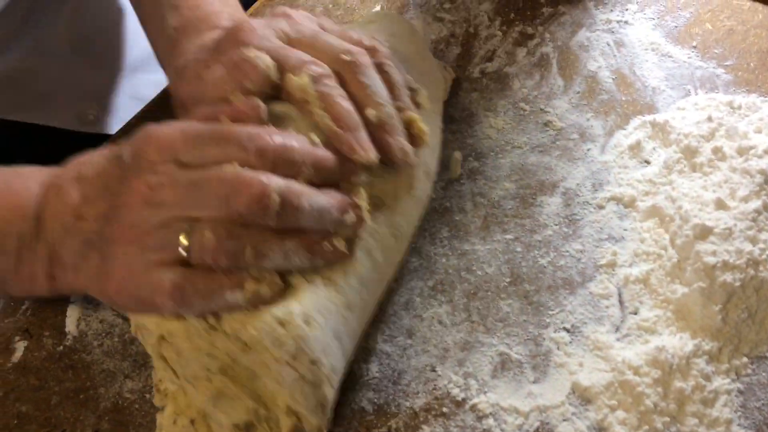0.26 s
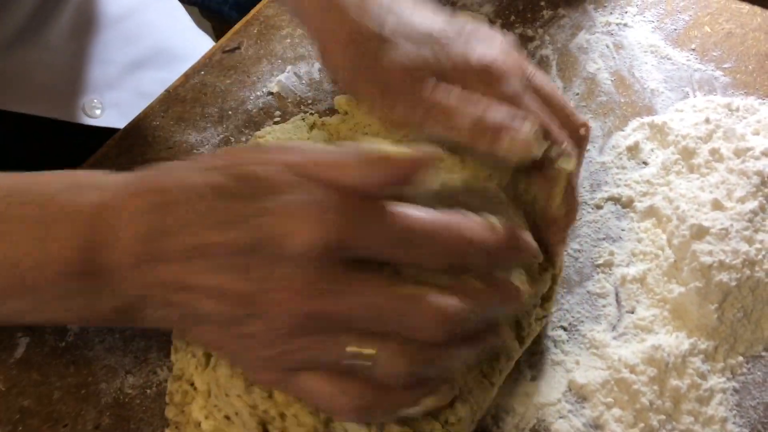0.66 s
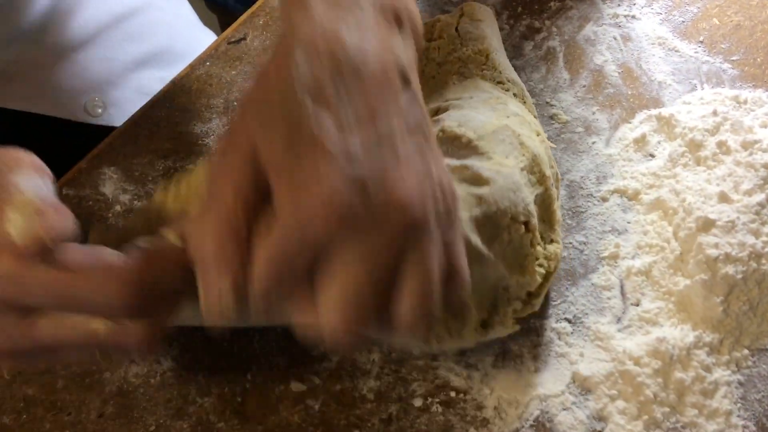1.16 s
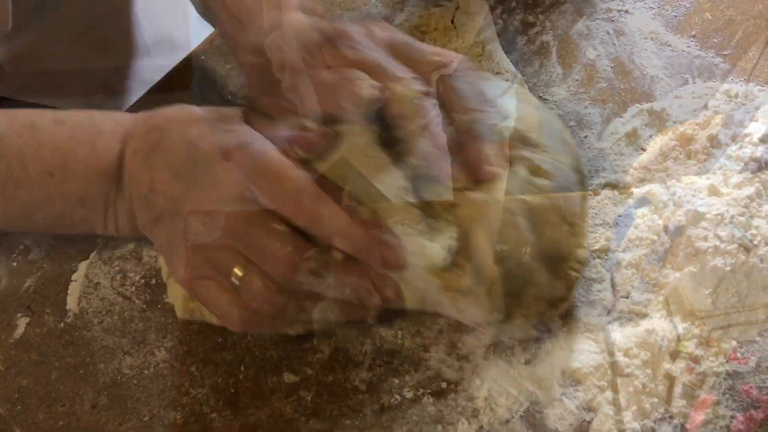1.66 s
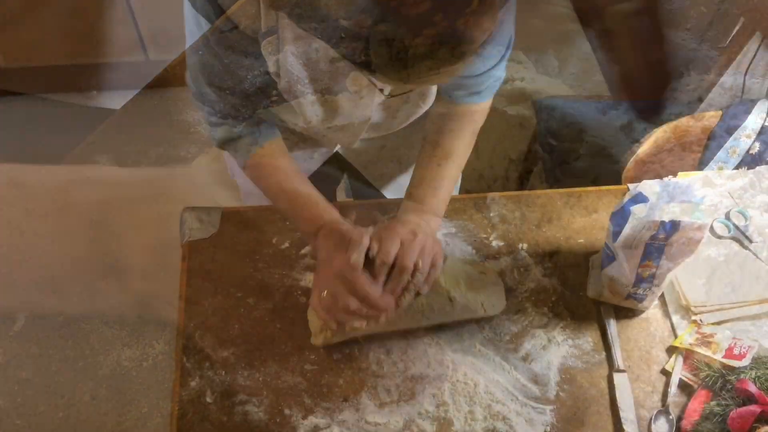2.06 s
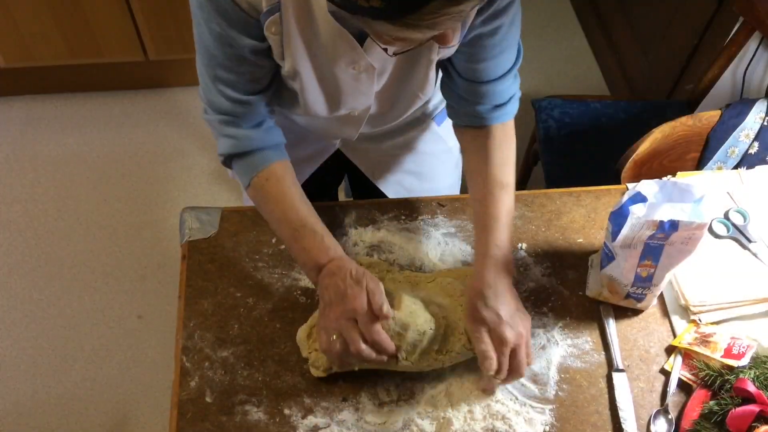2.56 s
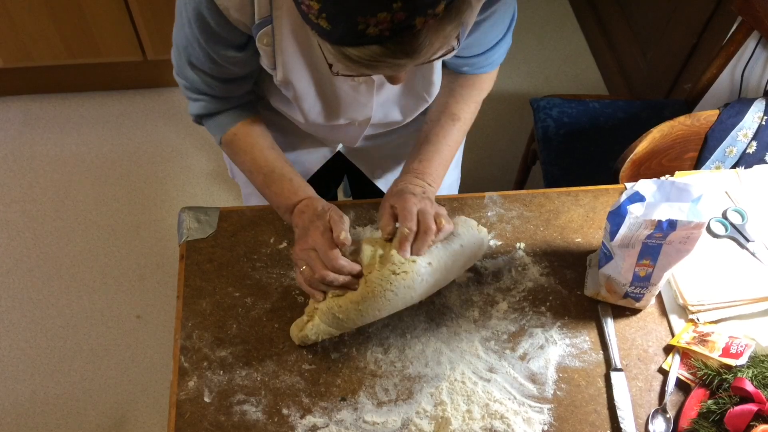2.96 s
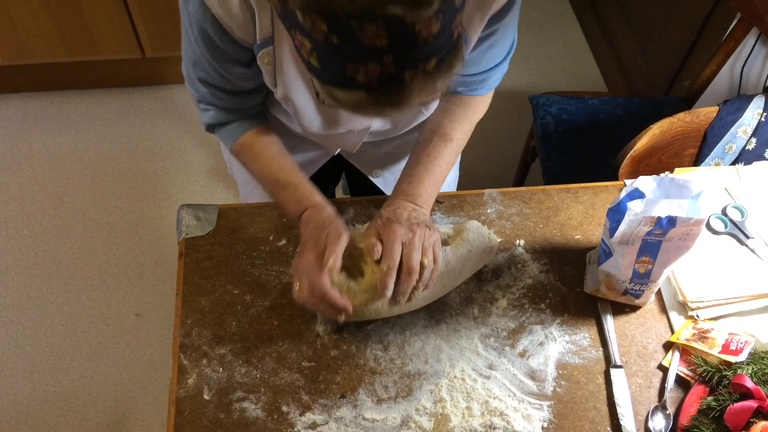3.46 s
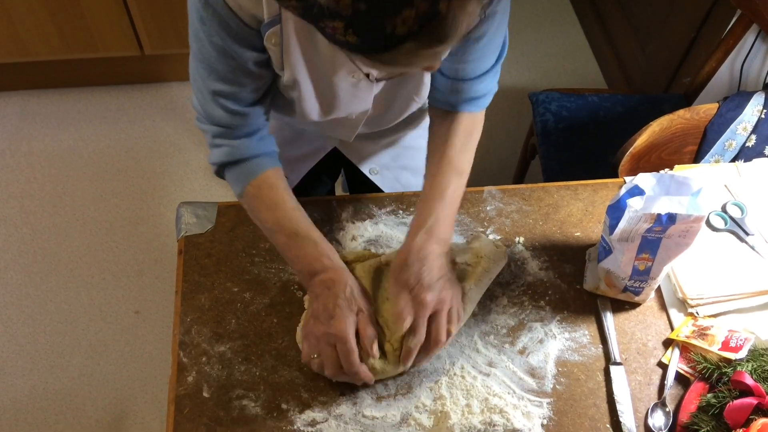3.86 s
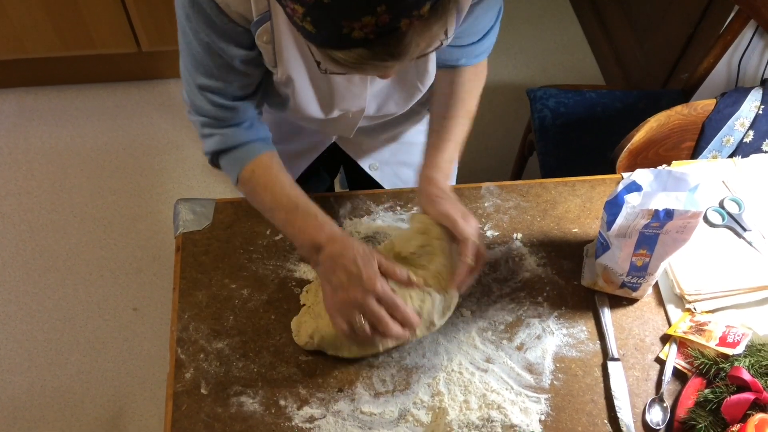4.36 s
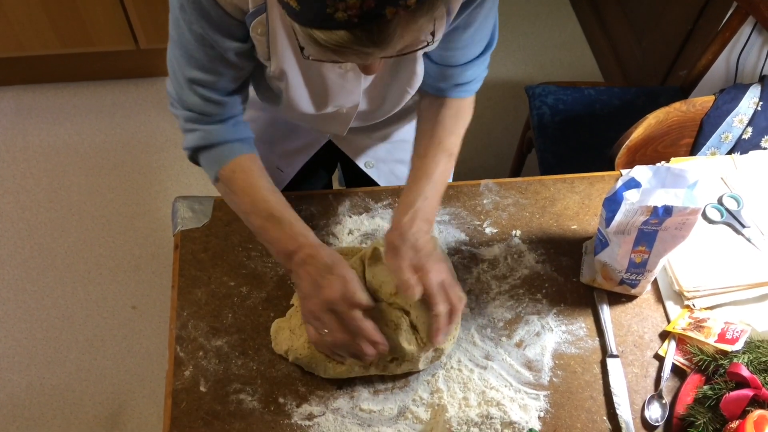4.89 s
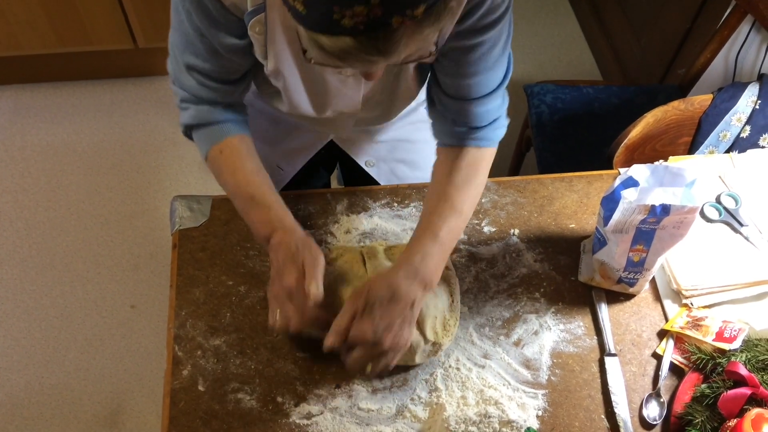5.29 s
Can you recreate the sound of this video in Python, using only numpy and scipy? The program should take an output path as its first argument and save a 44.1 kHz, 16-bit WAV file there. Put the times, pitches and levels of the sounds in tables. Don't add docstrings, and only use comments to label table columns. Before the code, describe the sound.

In a small kitchen with a low steady hum, hands push heavy dough against a wooden tabletop. A slap opens, dry hissing strokes follow, then a heavy cluster of thuds with sticky crackle. Later, quieter rubbing surrounds single hollow thumps that shake the table legs. A faint clock ticks about twice a second; short room echo.

```python
import sys
import numpy as np
from scipy import signal
from scipy.fft import rfft, irfft
from scipy.io import wavfile
from scipy.ndimage import uniform_filter1d

SR = 44100
rng = np.random.default_rng(int(sys.argv[2]) if len(sys.argv) > 2 else 0)


def decibels_to_gain(level_db):
    exponent = np.asarray(level_db, float) / 20
    return 10 ** exponent


def generate_wav(signal):
    frames = np.transpose(np.atleast_2d(signal))
    scaled = np.clip(frames, -1, 1) * 32767
    pcm = np.round(scaled).astype(np.int16)
    wavfile.write(sys.argv[1], SR, pcm)


N = 243873

# (frequency [Hz], level [dB])
HUM_SPECTRUM = [(15, -33.5), (25, -2), (70, 1.5), (102, 7.5), (130, -31.5), (373, -10.5), (416, -16),
                (591, -12), (887, -36.5), (2550, -20), (4140, -47), (14800, -40.5), (16000, -32.5)]
# (time [s], level [dB])
HAND_WEIGHT = [(0, -61), (.2, -57), (.7, -61), (1.2, -60), (1.8, -62), (2.05, -68.5), (2.9, -70.5),
               (3.15, -74), (3.75, -68), (4.4, -71), (4.9, -70.5), (5.53, -76)]
# (start [s], length [s], hiss level [dB], swell from start to end [dB])
STROKES = [(0, 0.038, -53, -22), (0.077, 0.51, -47, 15.5), (0.571, 0.1, -51, -8), (0.659, 0.086, -52, -12),
           (.79, 0.081, -67, 0), (.865, 0.085, -51, 0), (0.939, 0.2, -54.5, -9), (1.021, 0.49, -51, 15),
           (1.526, 0.36, -52.5, 9.5), (1.774, 0.29, -58, 1), (1.971, 0.082, -62, 3.5),
           (2.08, 0.46, -65, -2), (3.15, 0.14, -76, -1.5), (2.447, 0.18, -70.5, -4.5),
           (2.606, 0.14, -69, -13.5), (2.71, 0.33, -67.5, -2), (3.01, 0.15, -68.5, -1.5),
           (3.281, .13, -66, -0.5), (3.36, 0.28, -70.5, -7), (3.563, 0.48, -65, -10),
           (4.07, 0.38, -68, -2.5), (4.36, 0.51, -65.5, 10), (4.801, 0.18, -67, 6), (5.1, 0.21, -67.5, 0),
           (5.265, 0.5, -66.5, -6)]
# (time [s], crackle level [dB], table shake level [dB], 60 dB decay [s])
SQUASHES = [(0, -42, -22.5, 0.1), (.5, -56, -64, 0.2), (0.601, -51, -47, 0.46), (0.864, -39.5, -25.5, 0.67),
            (.97, -46, -28, 0.31), (1.04, -54, -34, 0.12), (1.36, -55, -48, 0.47),
            (2.625, -54.5, -62, 0.53), (3.27, -62, -49, 0.28), (3.32, -53.5, -70, 0.27),
            (4.229, -50.5, -43.5, 0.23), (4.92, -75, -59.5, 0.34), (5.1, -66.5, -47, .2),
            (5.12, -54, -66, 1)]
# (frequency [Hz], level [dB])
FLOUR_SPECTRUM = [(880, -36), (1500, -8.5), (1920, -4), (2140, -4.5), (2910, -9.5), (5710, -2),
                  (14600, -6.5), (15500, -3.5), (16000, -32.5)]
# (frequency [Hz], level [dB])
DOUGH_SPECTRUM = [(150, -40.5), (250, -10), (291, -0.5), (557, -6.5), (735, -3.5), (1080, -6.5), (1990, -9),
                  (4000, -19), (5200, -31), (8800, -120)]
# (time [s], peak level [dB], centre [Hz], 60 dB decay [s], flour spray level [dB])
SLAPS = [(.006, -24, 2060, 0.029, 4.5), (.009, -28.5, 1850, 0.0096, -15), (0.612, -43, 1500, 0.046, -14),
         (.872, -27.5, 870, 0.089, -1), (.879, -22, 809, 0.07, -9), (0.984, -29.5, 980, 0.045, -13),
         (1.077, -35, 790, 0.037, -13), (1.384, -36.5, 1030, 0.088, -24), (2.6295, -32, 900, 0.18, -19),
         (3.259, -59, 1210, 0.098, -25.5), (4.0848, -24, 1000, 0.25, -20), (4.194, -39, 696, 0.09, -28.5),
         (5.108, -30, 1450, 0.17, -28), (5.187, -46.5, 1400, 0.16, -17), (5.22, -49.5, 1200, 0.12, -19)]
# (time [s], peak level [dB], favoured top pitch [Hz], board level [dB], favoured board
# pitch [Hz])
BLOWS = [(.010, -21, 163, -9, 810), (.8715, -10, 202, -8, 614), (0.8782, -9.5, 182, -8, 429),
         (0.8829, 2, 178, -12, 635), (.982, -9.5, 186, -22, 417), (1.076, -36, 198, 0, 514),
         (1.384, -37.5, 132, -7.5, 719), (1.886, -44.5, 145, -13, 750), (2.199, -47.5, 137, -19.5, 516),
         (2.6288, -16, 211, -15, 806), (4.0852, -10, 262, -12.5, 590), (4.192, -28.5, 282, -3.5, 497),
         (5.102, -25.5, 194, -19, 390), (5.1148, -14, 180, -21, 450)]
# (time [s], peak level [dB], favoured top pitch
# [Hz], board level [dB])
MORE_BLOWS = [(.145, -34, 239, -14.5), (.151, -42, 239, -27), (.293, -40.5, 208, -13),
              (.344, -41.5, 229, -15.5), (.615, -36.5, 245, -9), (0.644, -38.5, 141, -24),
              (1.603, -42.5, 140, -12), (1.793, -55.5, 170, -1), (2.768, -41.5, 150, -28),
              (3.257, -31.5, 174, -20.5), (3.275, -36.5, 176, -19), (3.31, -46, 168, -12.5),
              (3.345, -40, 141, -19), (3.898, -57.5, 292, -2), (4.245, -43.5, 142, -2.5),
              (4.874, -59.5, 251, 3), (5.186, -28, 164, -12.5), (5.214, -23.5, 227, -22),
              (5.423, -45, 150, -28)]
# (time [s], peak level [dB])
LEANS = [(.010, -26.5), (.145, -40.5), (0.292, -48), (.615, -45), (.645, -36), (.878, -39), (1.383, -42),
         (1.793, -50.5), (2.199, -49), (2.6288, -20), (2.769, -55), (3.274, -40), (3.311, -50.5),
         (3.345, -34), (4.0872, -23), (4.191, -29.5), (4.245, -39), (5.115, -26), (5.186, -39),
         (5.42, -40.5)]
# (frequency [Hz], level [dB], 60 dB decay [s])
LEG_MODES = [(48.6, -13.5, 0.46), (71.5, 3.5, 0.21), (84, -7, .3)]
# (frequency [Hz], level [dB], 60 dB decay [s])
TOP_MODES = [(133.87, 2.5, 0.38), (163.7, -5.5, 0.23), (174.96, 4, 0.23), (204.6, 1, 0.22), (225.4, -1, .2),
             (253, -3, 0.12), (290.4, -3.5, .18)]
# (frequency [Hz], level [dB], 60 dB decay [s])
BOARD_MODES = [(341.5, -0.5, 0.1297), (365, 10, 0.068), (424, -5, 0.34), (491.4, -6.5, .2),
               (533, -2.5, 0.11), (594.5, -2, 0.042), (629.6, -3.5, .1), (722.4, -5.5, 0.099),
               (854.7, -1.5, 0.049), (1068, -3, 0.097), (1250, -6.5, 0.084)]
# (time [s], peak level [dB], centre [Hz], 60 dB decay [s])
TAPS = [(0.1367, -34, 1200, 0.065), (0.1334, -46, 1920, 0.058), (0.2128, -34.5, 4900, 0.22),
        (0.623, -28.5, 1640, 0.046), (0.9832, -31.5, 1290, 0.28), (1.138, -36, 5900, 0.029),
        (1.334, -27, 6000, 0.02), (1.449, -30, 5920, 0.026), (1.5453, -38.5, 1250, 0.15),
        (1.606, -35.5, 1610, 0.066), (1.6812, -37, 2100, 0.032), (1.927, -42, 1711, 0.21),
        (3.083, -48, 7330, 0.042), (3.8607, -53, 1430, 0.041), (3.9094, -46, 1720, 0.054),
        (4.3594, -57, 2060, 0.031), (4.4213, -50, 7450, 0.0301), (4.871, -45.5, 1320, 0.27)]
# (time [s], peak level [dB], catch relative to drop [dB], rattle of the works [dB])
TICKS = [(0.3661, -43.5, -19, -15), (0.8002, -37, -9.5, -6), (1.272, -43.5, -18, -1),
         (1.7033, -41, -17, -6), (2.1787, -54.5, -12, -0.5), (2.3988, -50.5, -2.5, -2),
         (2.8751, -57, -6.5, 3.5), (3.3059, -50, 1, -1), (3.7843, -54, -2, 0), (4.2222, -49.5, -1, -4.5),
         (4.6955, -57, -4, 4.5), (5.1277, -48, -1.5, -3.5)]
# (frequency [Hz], level [dB], 60 dB decay [s])
CASE_MODES = [(1650, -8, .04), (1995, -6, .04), (2075, 0, .045), (2168, -1, .045), (2450, -12, .03)]
# (frequency [Hz], level [dB])
WORKS_SPECTRUM = [(700, -19), (1050, -1.5), (1350, -12.5), (1700, -2.5), (2700, -3.5), (3460, 1),
                  (4330, -10.5), (5200, -6), (7000, -25)]
# (frequency [Hz], 60 dB decay [s])
ROOM_DECAY = [(150, 0.47), (600, 0.49), (2000, 0.18), (6000, 0.17), (13000, 0.05)]


def fade(t, t60):
    return np.exp(-np.log(1000) * t / t60)


def colour(x, shape):
    hz, db = np.transpose(shape)
    f = np.arange(len(x) // 2 + 1) * SR / len(x) + 1
    gain = decibels_to_gain(np.interp(np.log(f), np.log(hz), db))
    low_end = np.clip(f / hz[0], 0, 1) ** 2
    y = irfft(rfft(x) * gain * low_end, len(x))
    return y / np.sqrt(np.mean(y ** 2))


def noise_burst(size, shape):
    return colour(rng.standard_normal(size), shape)


def walk(rate):
    k = int(SR / rate)
    steps = np.repeat(rng.standard_normal(N // k + 1), k)
    return 1.1 * uniform_filter1d(uniform_filter1d(steps, k), k)[:N]


def ring(modes, spread_db, size):
    t = np.arange(size) / SR
    out = np.zeros(size)
    for hz, db, t60 in modes:
        level_luck, pitch_luck = rng.standard_normal(2)
        sine = np.sin(2 * np.pi * hz * (1 + .004 * pitch_luck) * t)
        out += decibels_to_gain(db + spread_db * level_luck) * fade(t, t60) * sine
    return out


def favour(modes, spot_hz, narrow_db):
    return [(hz, db - narrow_db * np.log(hz / spot_hz) ** 2, t60) for hz, db, t60 in modes]


def add(track, s, x):
    i = max(int(s * SR), 0)
    track[i:i + len(x)] += x[:N - i]


def kitchen_hum():
    return noise_burst(N, HUM_SPECTRUM) * decibels_to_gain(-60.5 - 3.5 + 0.52 * walk(2.7))


def hand_weight_db(t):
    return np.interp(t, *np.transpose(HAND_WEIGHT))


def stroke_gain(t):
    still_db, roundness = -4.5, .7
    power = decibels_to_gain(still_db + hand_weight_db(t)) ** 2
    for s, length, db, swell_db in STROKES:
        part = np.clip((t - s) / length, 0, 1)
        arch = np.abs(np.sin(np.pi * part)) ** roundness
        power = power + (decibels_to_gain(db + swell_db * (part - .5)) * arch) ** 2
    return np.sqrt(power)


def squash_gain(t, column, steady_db):
    rise_s = 0.0083
    power = decibels_to_gain(hand_weight_db(t) + steady_db) ** 2
    for row in SQUASHES:
        since = np.clip(t - row[0], 0, None)
        pressure = np.minimum(since / rise_s, 1) * fade(since, row[3])
        power = power + (decibels_to_gain(row[column]) * pressure) ** 2
    return np.sqrt(power)


def grains():
    return rng.standard_normal(N) * decibels_to_gain(1.8 * rng.exponential(size=N))


def flour_hiss(t):
    return colour(grains(), FLOUR_SPECTRUM) * stroke_gain(t) * decibels_to_gain(1.4 * walk(44) + 1.2 * walk(150))


def sticky_crackle(t):
    unevenness = decibels_to_gain(1.7 * walk(25) + 0.4 * walk(110))
    return colour(grains(), DOUGH_SPECTRUM) * squash_gain(t, column=1, steady_db=0) * unevenness


def table_shake(t):
    table = ring(TOP_MODES, .1, SR // 2) + decibels_to_gain(-6.5) * ring(LEG_MODES, .1, SR // 2)
    force = rng.standard_normal(N) * decibels_to_gain(2.5 * walk(20))
    shake = signal.fftconvolve(force, table)[:N]
    return shake / shake.std() * squash_gain(t, column=2, steady_db=2.5)


def slaps():
    out, t = np.zeros(N), np.arange(SR // 3) / SR
    spray_shape = [(2800, -15.5), (5200, 4.5), (8000, -17), (15000, -17.0)]
    for s, db, hz, t60, spray_db in SLAPS:
        air_shape = [(hz / 4, -12), (hz / 1.6, 0), (hz * 1.3, -5), (hz * 2.2, -21), (hz * 3, -36), (15000, -48)]
        crack_shape = [(hz / 3, -10), (hz * .9, 0), (hz * 2.1, -6), (hz * 2.6, -27), (15000, -38)]
        air = noise_burst(len(t), air_shape) * fade(t, t60)
        spray = noise_burst(len(t), spray_shape) * fade(t, 0.74 * t60) * (1 - fade(t, .012))
        crack = noise_burst(len(t), crack_shape) * fade(t, 0.025) * (1 - fade(t, .003))
        add(out, s, decibels_to_gain(db - 5.5) * (1.9 * crack + 0.82 * air + decibels_to_gain(spray_db) * spray))
    return out


def blows():
    out, t = np.zeros(N), np.arange(SR // 2) / SR
    low_cut = signal.butter(2, 120, "high", fs=SR, output="sos")
    pressed = 0.51 + .55 * fade(t, 0.091)
    middle_board_hz = 410
    more_blows = [(*row, middle_board_hz) for row in MORE_BLOWS]
    for s, db, top_hz, boards_db, boards_hz in [*BLOWS, *more_blows]:
        top = ring(favour(TOP_MODES, top_hz, 115), .6, len(t))
        top = top * (1 - fade(t, .02))
        boards = ring(favour(BOARD_MODES, boards_hz, 26), 1.5, len(t)) * (1 - fade(t, .006))
        wood = signal.sosfilt(low_cut, top + decibels_to_gain(boards_db) * boards)
        add(out, s - .0005, decibels_to_gain(db - 4.0) * pressed * wood)
    return out


def leg_bounces():
    out, t = np.zeros(N), np.arange(SR // 2) / SR
    for s, db in LEANS:
        add(out, s, decibels_to_gain(db - 2.5) * ring(LEG_MODES, 1.0, len(t)) * (1 - fade(t, .08)))
    return out


def taps():
    out, t = np.zeros(N), np.arange(SR // 5) / SR
    for s, db, hz, t60 in TAPS:
        shape = [(hz / 3, -12), (hz, 0), (hz * 4.8, -10), (16000, -30)]
        add(out, s - .0005, decibels_to_gain(db - 12.0) * noise_burst(len(t), shape) * fade(t, t60))
    return out


def clock():
    out, t = np.zeros(N), np.arange(SR // 4) / SR
    catch_s = 0.028
    for s, db, catch_db, works_db in TICKS:
        for lag, hit_db in ((0, db), (catch_s, db + catch_db)):
            chatter = rng.standard_normal(len(t)) ** 3 * fade(t, 0.092) * (1 - fade(t, 0.036))
            case = signal.fftconvolve(chatter, ring(CASE_MODES, 2.0, len(t)))[:len(t)]
            works = decibels_to_gain(works_db) * colour(chatter, WORKS_SPECTRUM) / 12
            add(out, s - .002 + lag, decibels_to_gain(hit_db + 3.0) * (case / np.abs(case).max() + works))
    return out


def room(x):
    t, tail = np.arange(SR // 2) / SR, 0
    for hz, t60 in ROOM_DECAY:
        band = noise_burst(len(t), [(hz / 3, -12), (hz, 0), (hz * 3, -12)])
        tail = tail + band * fade(t, t60) * np.sqrt(hz)
    tail = tail * np.clip(t / 0.0044, 0, 1)
    return signal.fftconvolve(x, tail / np.sqrt(np.sum(tail ** 2)))[:N]


def scene():
    t = np.arange(N) / SR
    hum = kitchen_hum()
    rubbing = flour_hiss(t) + sticky_crackle(t) + table_shake(t)
    near = slaps() + blows() + leg_bounces() + taps()
    far = clock()
    answer = room(decibels_to_gain(-15.5) * near + decibels_to_gain(-4) * far)
    return (hum + rubbing + near + far + answer)[None]


def roll_off(x):
    return signal.sosfilt(signal.butter(12, 16250, fs=SR, output="sos"), x)


def record(dry):
    bass_cut = signal.butter(2, 36, "high", fs=SR, output="sos")
    top_cut = signal.ellip(10, .3, 60, 15420, fs=SR, output="sos")
    heard = signal.sosfilt(bass_cut, dry)
    rounded = np.tanh(.6 * heard) / .6
    return roll_off(signal.sosfilt(top_cut, rounded))


dry = scene()
out = record(dry)
generate_wav(out)
```